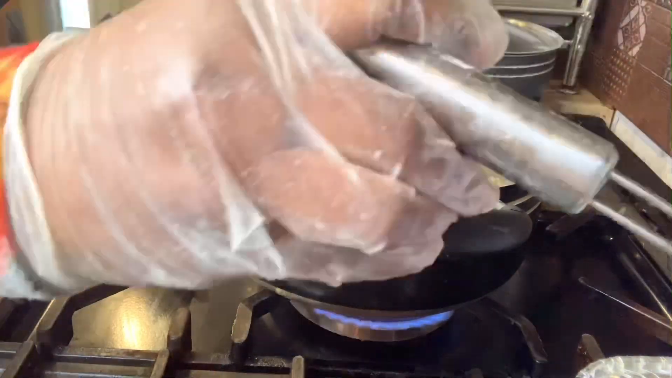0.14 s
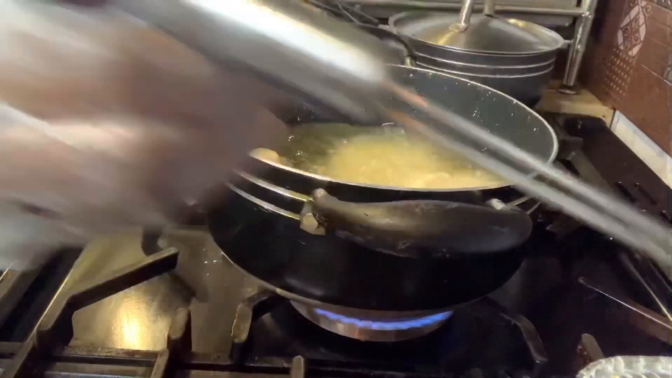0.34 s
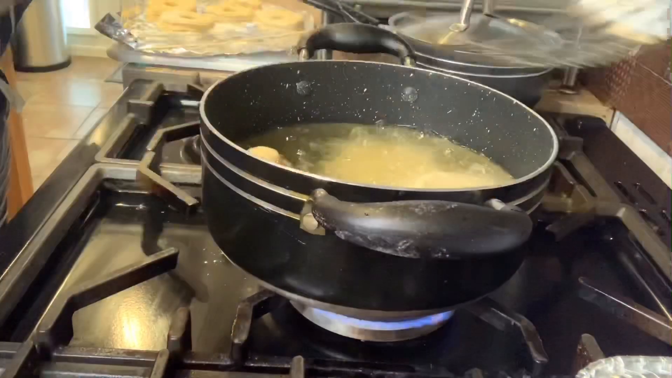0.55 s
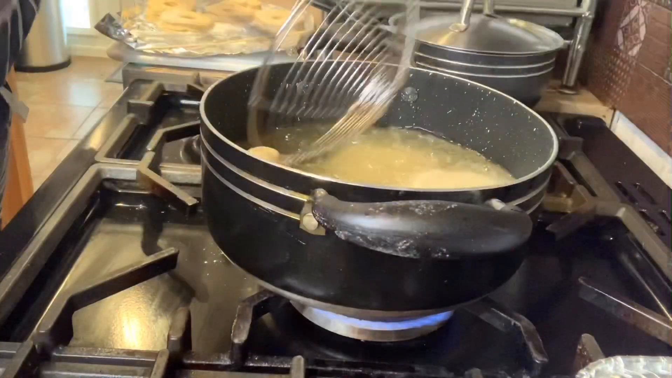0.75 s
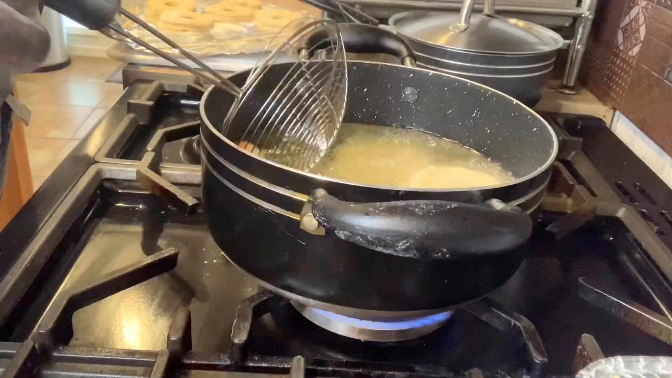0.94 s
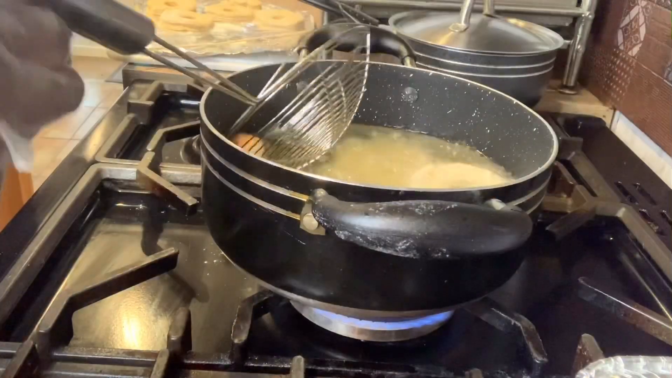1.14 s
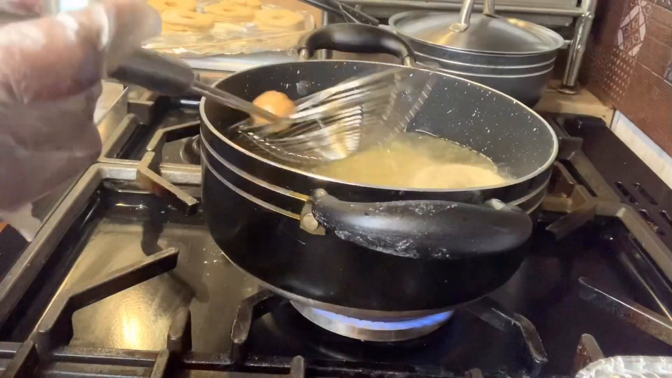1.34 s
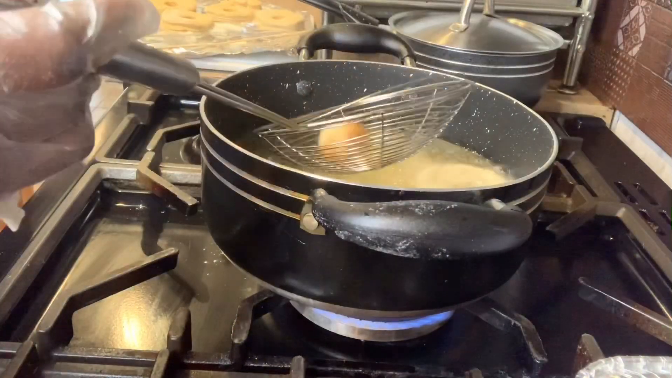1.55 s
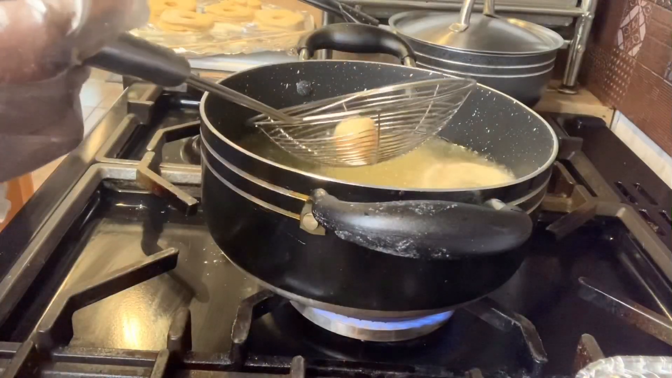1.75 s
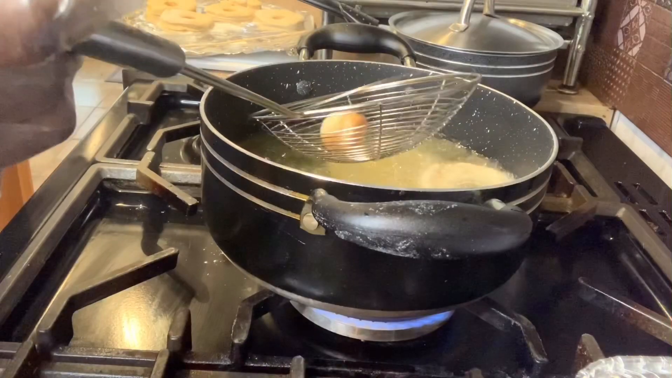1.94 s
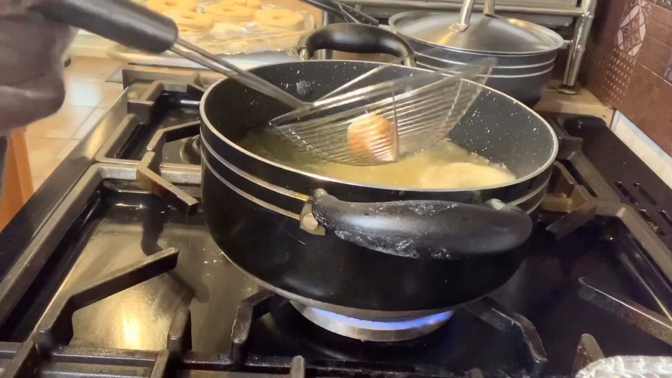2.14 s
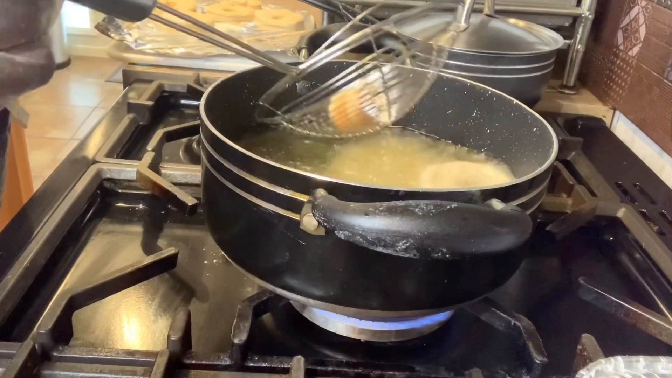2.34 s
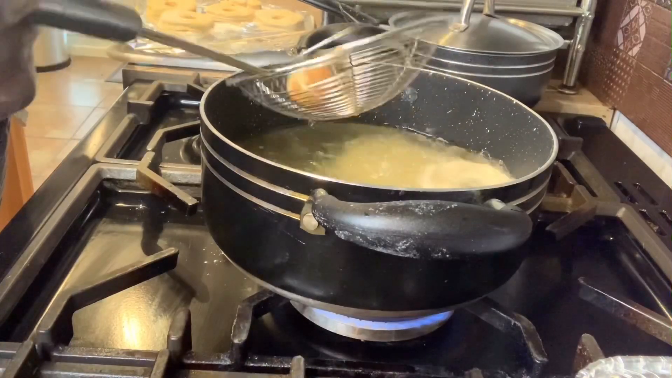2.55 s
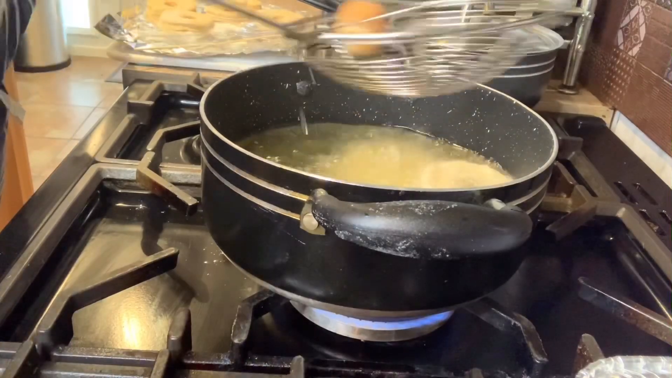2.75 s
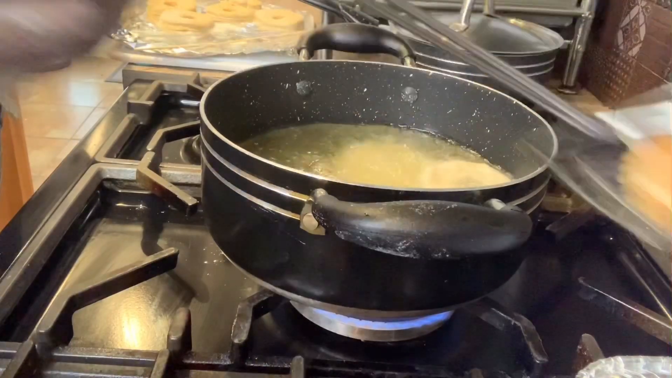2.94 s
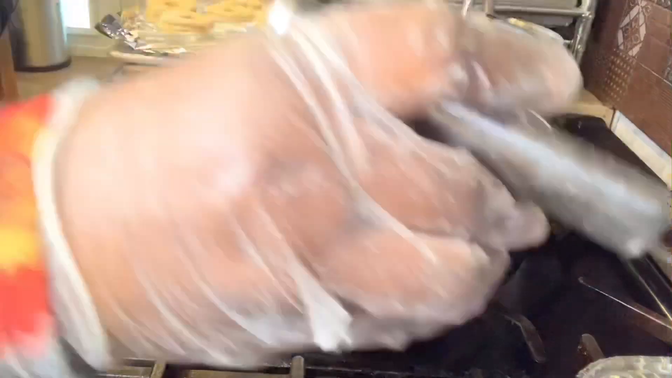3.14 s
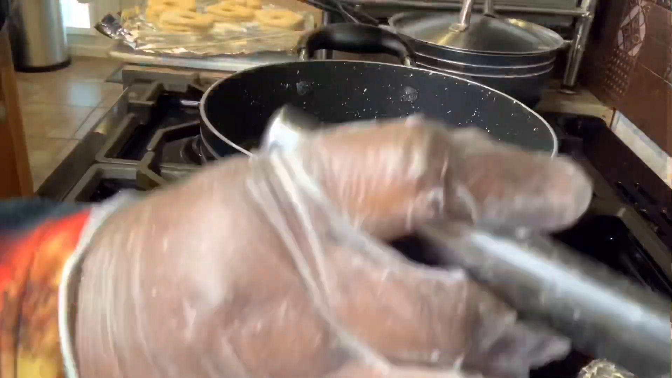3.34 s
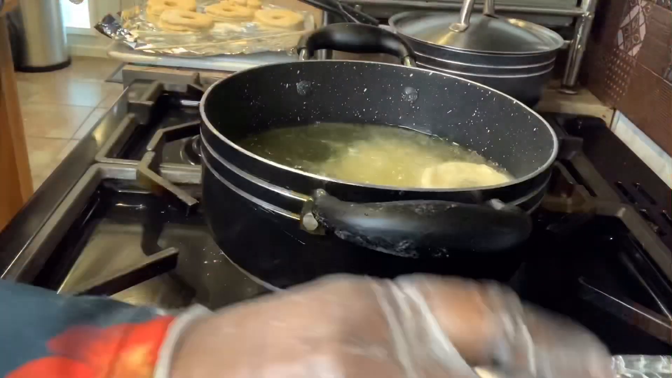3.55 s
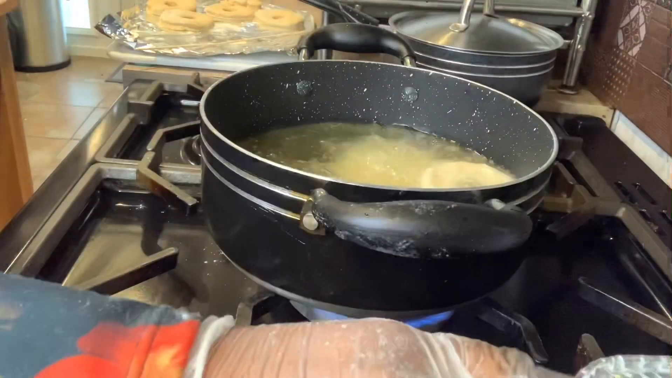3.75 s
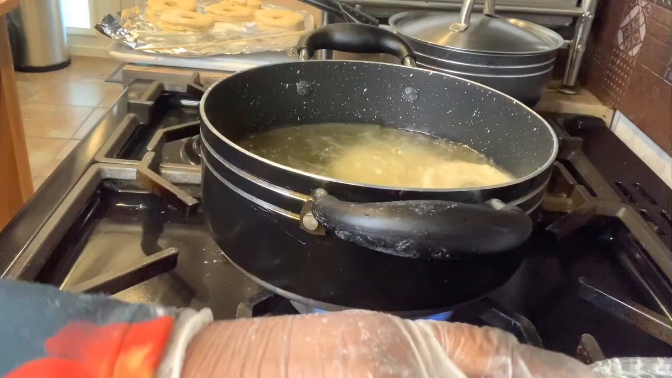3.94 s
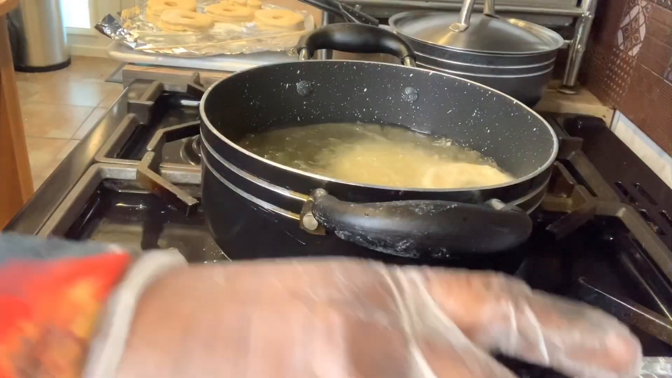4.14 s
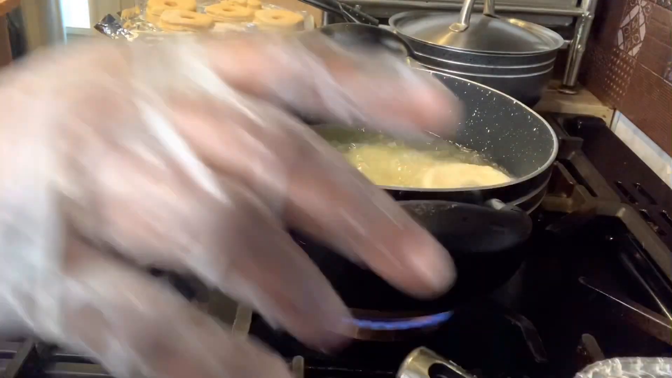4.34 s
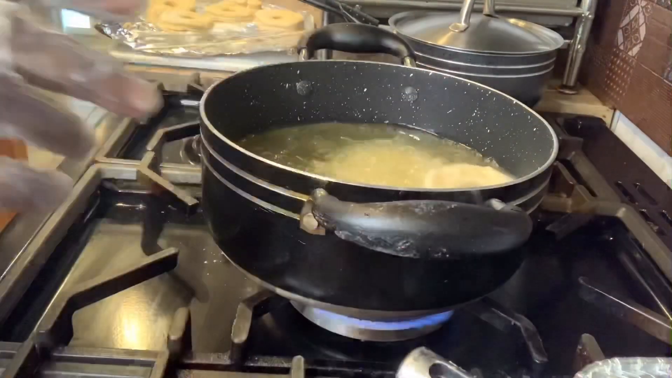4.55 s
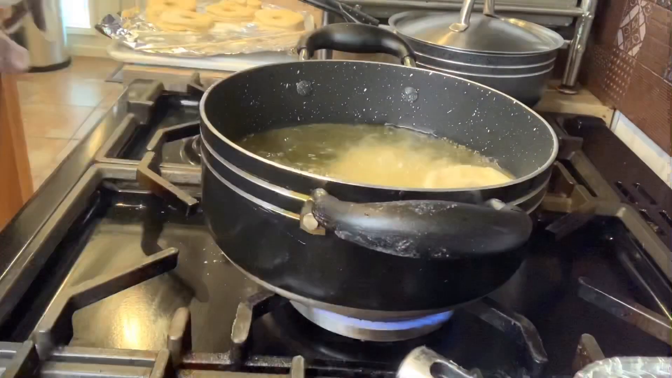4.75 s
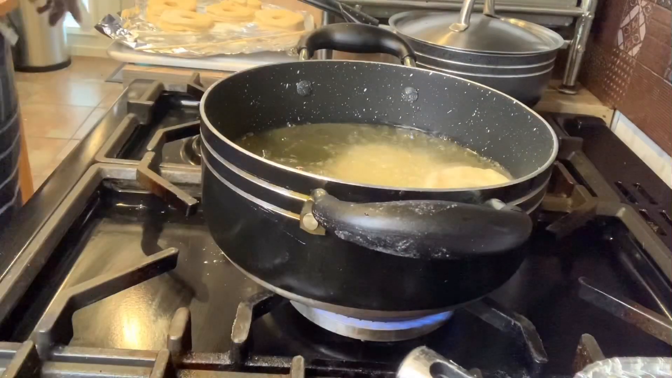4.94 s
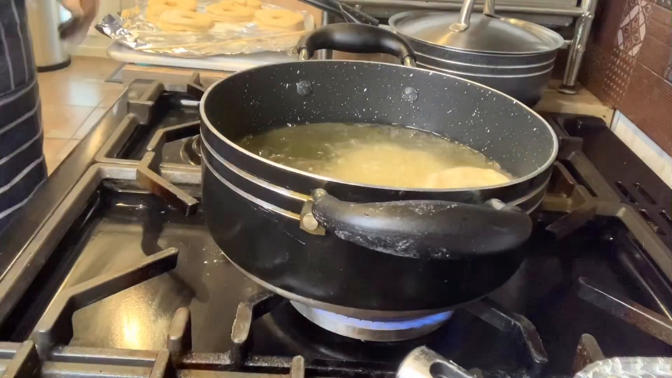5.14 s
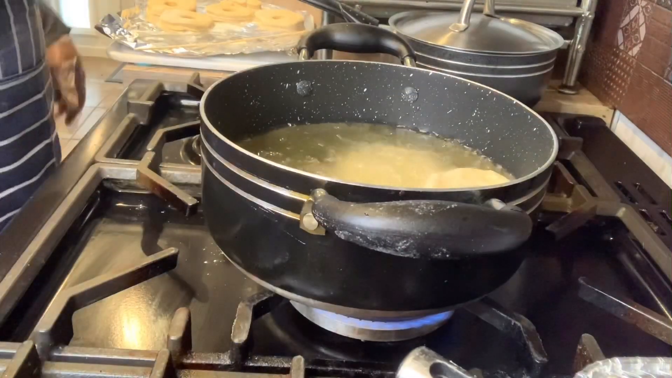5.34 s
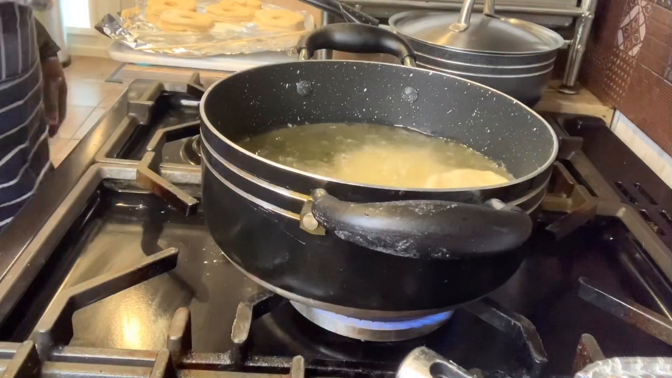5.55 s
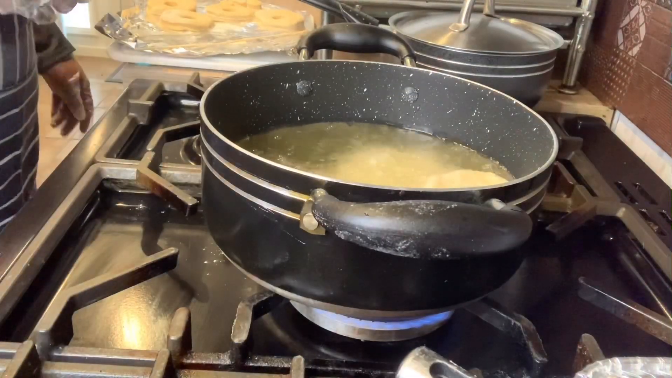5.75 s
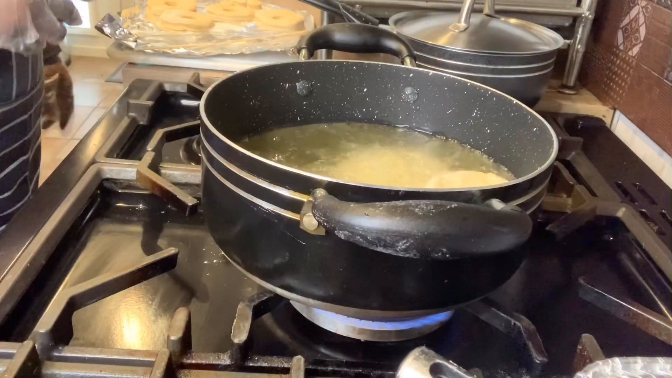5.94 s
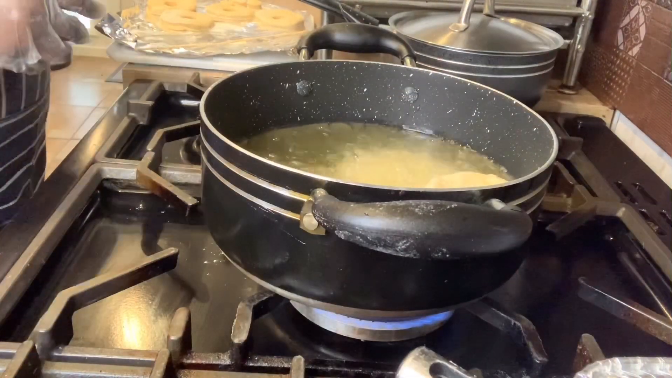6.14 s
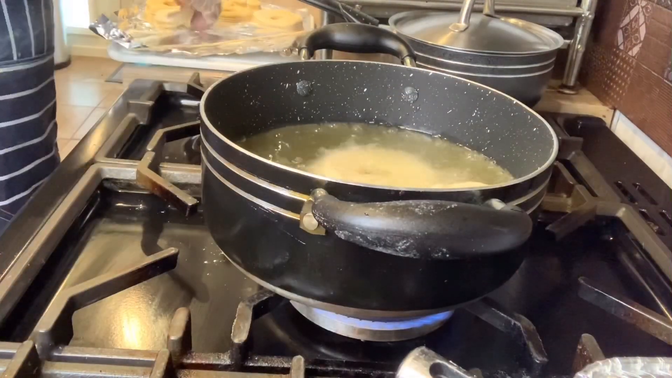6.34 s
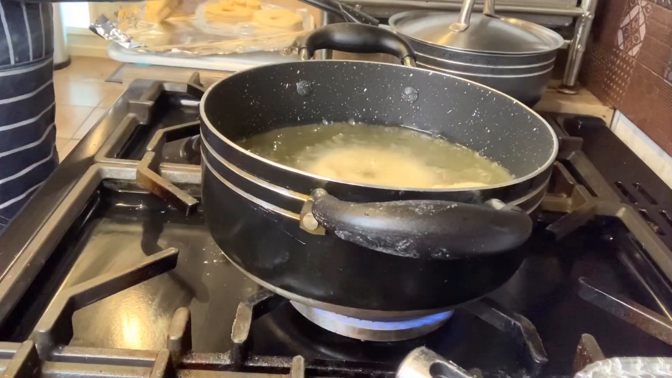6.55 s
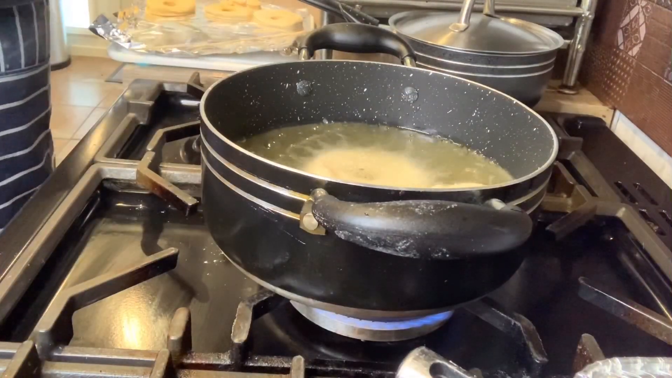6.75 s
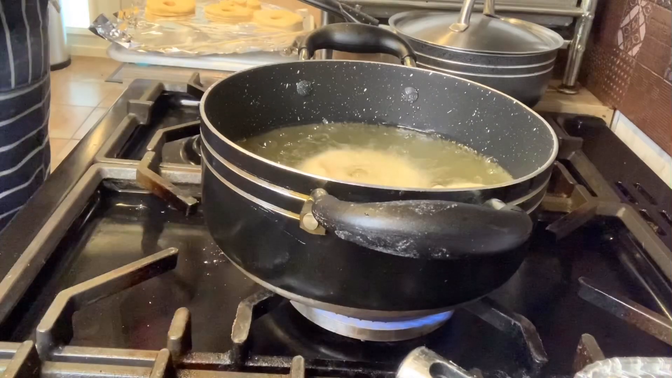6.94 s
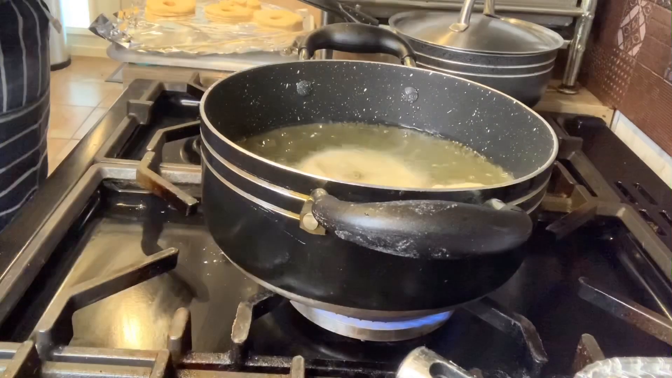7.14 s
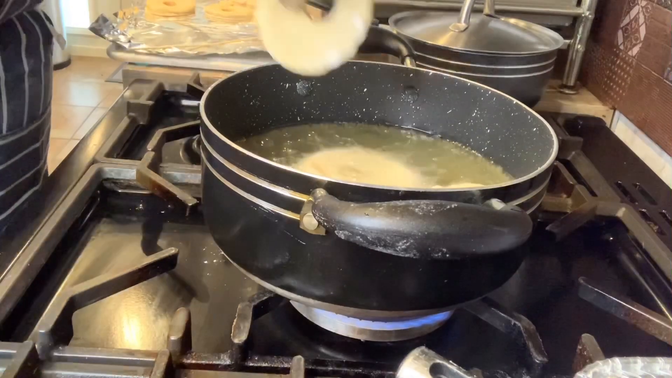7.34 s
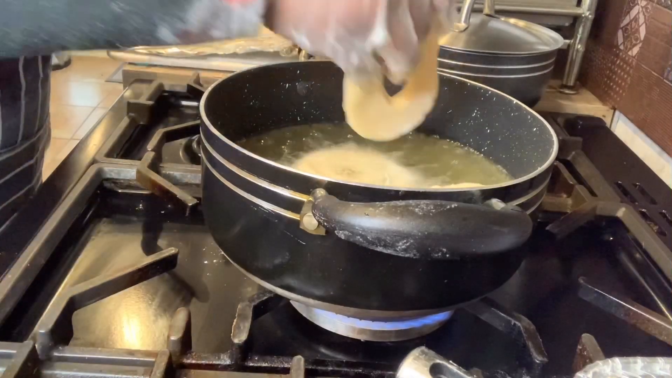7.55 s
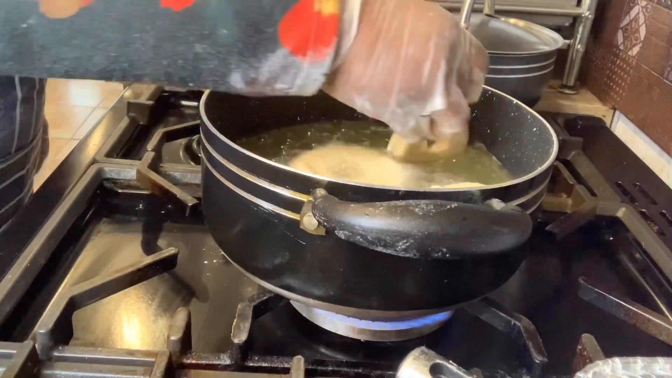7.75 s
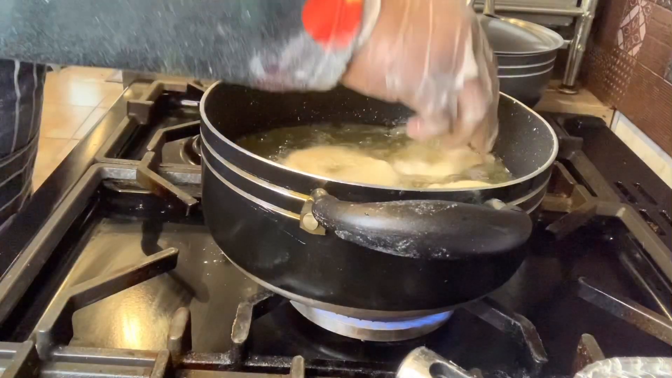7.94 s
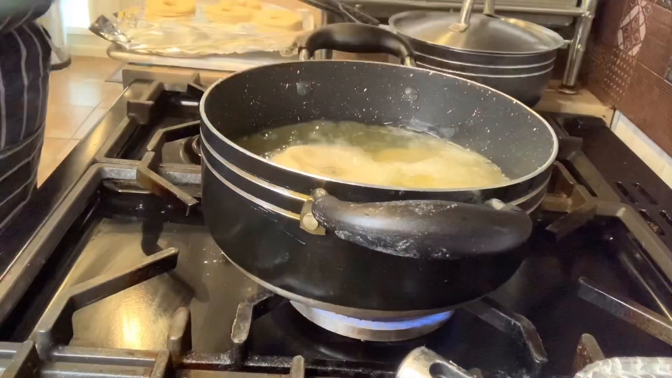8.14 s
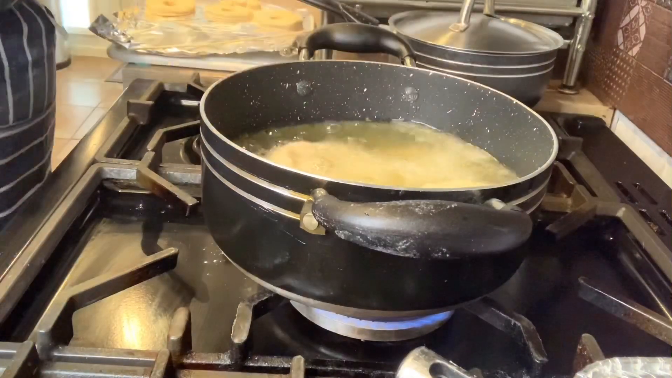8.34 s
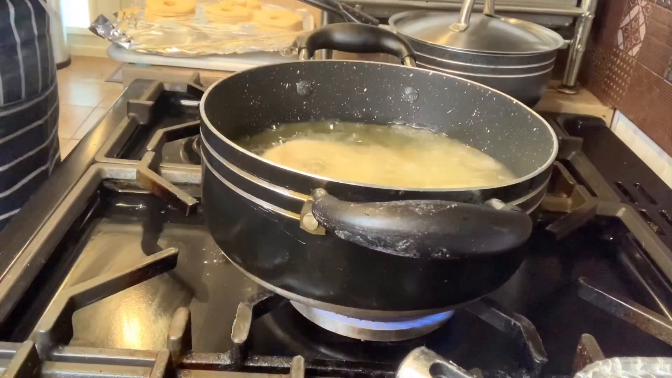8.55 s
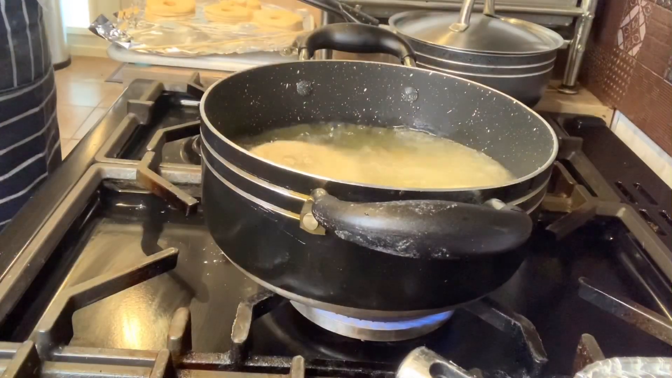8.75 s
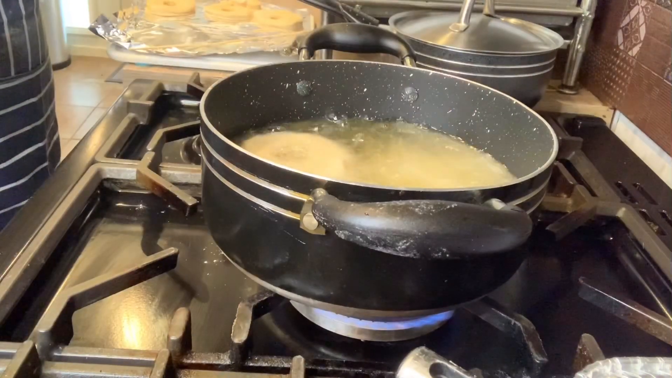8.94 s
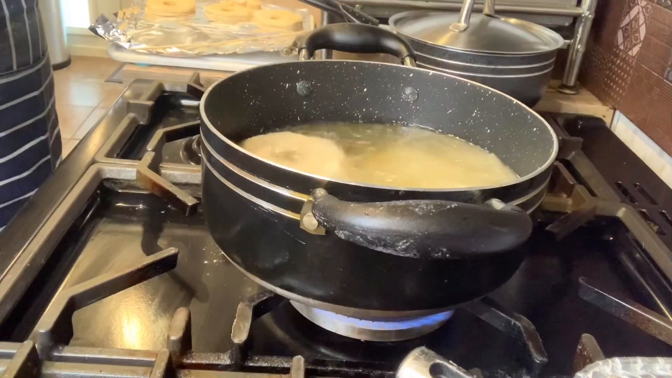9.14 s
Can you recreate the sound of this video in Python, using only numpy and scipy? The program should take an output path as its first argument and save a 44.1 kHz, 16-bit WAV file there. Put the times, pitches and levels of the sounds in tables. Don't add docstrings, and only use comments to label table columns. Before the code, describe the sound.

Close stereo phone pickup of home frying: steady airy burner hiss, fine bubbling and a soft low fan hum. Early metal knocks and light wire clinks at the pot give way to one sharp iron clang as the skimmer is laid down, with small rattles dying away. Sparse oil pops, a dry burst of crinkling foil, then only quiet frying in a short room echo.

```python
import sys
import numpy as np
from scipy import signal
from scipy.fft import rfft, irfft, next_fast_len
from scipy.io import wavfile
from scipy.ndimage import uniform_filter1d, map_coordinates

SR = 44100
rng = np.random.default_rng(int(sys.argv[2]) if len(sys.argv) > 2 else 0)


def amplitude_ratio(level_db):
    exponent = np.asarray(level_db, float) / 20
    return 10 ** exponent


def output_pcm(signal):
    pcm = np.clip(np.atleast_2d(signal).T, -1, 1) * 32767
    wavfile.write(sys.argv[1], SR, np.round(pcm).astype(np.int16))


N = 405367


def unit(x):
    return x / np.sqrt(np.mean(x ** 2) + 1e-20)


def along(points, hz):
    f, v = np.transpose(points)
    return np.interp(np.log(hz + 1), np.log(f + 1), v)


def wobble(rate):
    knots = rng.standard_normal(int(N * rate / SR) + 4)
    return map_coordinates(knots, [np.arange(N) * rate / SR])


def filtered(x, response):
    m = next_fast_len(x.shape[-1] + 8192)
    spectrum = rfft(x, m) * response(np.fft.rfftfreq(m, 1 / SR))
    return irfft(spectrum, m)[..., :x.shape[-1]]


def coloured(x, spectrum):
    return filtered(x, lambda hz: unit(amplitude_ratio(along(spectrum, hz))))


def resonant(x, peaks):
    def response(f):
        total = 0
        for k, (centre, width, db) in enumerate(peaks):
            damping = 1j * f * width
            total = total + (-1) ** k * amplitude_ratio(db) * damping / (centre * centre - f * f + damping)
        return total / np.sqrt(np.mean(abs(total) ** 2))
    return filtered(x, response)


def noise(patchy_db):
    z = signal.stft(rng.standard_normal((2, N)), nperseg=512)[2]
    field = uniform_filter1d(rng.standard_normal(z.shape[1:]), size=4, axis=0)
    field = uniform_filter1d(field, size=8, axis=1)
    return unit(signal.istft(z * amplitude_ratio(patchy_db * unit(field)), nperseg=512)[1][:, :N])


def tone(hz, db):
    phase = 2 * np.pi * np.cumsum(hz * np.ones(len(db))) / SR
    return amplitude_ratio(db + 3.5) * np.array([np.sin(phase), 0.32 * np.cos(phase)])


def add(track, s, sound):
    part = track[:, round(s * SR):][:, :sound.shape[1]]
    part += sound[:, :part.shape[1]]


def burst(t60, attack):
    t = np.arange(SR // 5) / SR
    envelope = amplitude_ratio(-60 * t / max(t60, .004)) * (1 - np.exp(-t / attack))
    return rng.standard_normal((2, len(t))) * envelope


def hood():
    # pitch_hz, level_db
    orders = [(56.5, -56), (113, -61.5), (226, -68.5)]
    # pitch_hz, level_db
    rumble = [(15, -34), (25, -11), (43, -4.5), (67, -7.5), (126, -4), (184, -12.5), (295, -13), (316, -12),
              (358, -32), (401, -20), (545, -30), (609, -20.5), (700, -20), (910, -63), (1540, -120)]
    lines = 0
    for k, (hz, db) in enumerate(orders):
        lines = lines + tone(hz + 0.318 * wobble(2.5), db + (0.63 + 0.5335 * k) * wobble(7))
    return lines + amplitude_ratio(-55 + 0.51 * wobble(5)) * coloured(noise(patchy_db=2.0), rumble)


def burner():
    # pitch_hz, level_db
    flame = [(300, -1), (600, -6), (1400, -1), (1690, 8), (2050, -1.5), (2900, -4.5), (4000, -3.5),
             (6000, -2.5), (6450, 3), (7000, 1), (10500, 3), (13000, -2), (15700, -0.5), (16000, -41.5)]
    # start_s, end_s, level_db
    spells = [(.2, .4, -63.5), (.65, 1.4, -63.5), (1.6, 3.05, -65), (3.25, 3.55, -67), (3.8, 4.5, -73.5),
              (4.6, 5.75, -64.5), (6.1, 7.43, -65.5), (7.75, 8.852, -62.5), (9.03, 9.3, -63)]
    off_db, fade_s = -90.5, 0.04606
    t = np.arange(N) / SR
    hz = 11250 + 4.1 * t
    db = off_db
    for start, end, level in spells:
        db = db + (level - off_db) * np.clip(np.minimum(t - start, end - t) / fade_s, 0, 1)
    whistle = tone(hz + 9 * wobble(2.5) + 15 * wobble(70), db + 2.16 * wobble(25))
    return whistle + amplitude_ratio(-50.5 + wobble(8.4) / 3) * coloured(noise(patchy_db=1.9), flame)


def glove():
    # start_s, length_s, level_db, pitch_hz, width_hz
    scuffs = [(3.32, 0.35, -50, 9900, 5700), (3.6, .04, -45.5, 10700, 4800), (5.4, .2, -54, 2040, 2050)]
    out = np.zeros((2, N))
    for s, length, db, centre, width in scuffs:
        stroke = np.hanning(int(length * SR))
        rub = stroke * rng.standard_normal((2, len(stroke)))
        add(out, s, amplitude_ratio(db) * resonant(rub, [(centre, width, 0)]))
    return out


def foil():
    # start_s, peak_db
    creases = [(6.1856, -27.5), (6.196, -24), (6.2244, -28.5), (6.2396, -28), (6.2692, -34.5),
               (6.3323, -26), (6.3449, -32), (6.3853, -29.5), (6.4109, -29), (6.4711, -24), (6.4941, -21.5),
               (6.5072, -24.5), (6.5183, -26), (6.5444, -47)]
    # pitch_hz, level_db
    sheet = [(1000, -26), (3000, -13), (4700, -7), (7000, -3), (11000, 0), (15700, -2), (16200, -30)]
    # pitch_hz, level_db
    slack = [(500, -17), (1200, -10), (2300, -12), (3200, -6), (4700, 0), (6500, -4), (9000, -30)]
    t60 = 0.1995
    bright, dull = np.zeros((2, 2, N))
    for s, db in creases:
        add(bright, s - .001, amplitude_ratio(db - 8) * burst(t60, attack=0.00107))
        add(dull, s - .001, amplitude_ratio(db - 26.5) * burst(1.733 * t60, attack=0.00517))
    clumps = amplitude_ratio(2.26 * wobble(350) + 1.26 * wobble(90))
    return coloured(bright * clumps, sheet) + coloured(dull * clumps, slack)


def bubbles():
    # time_s, level_db
    bubbling = [(0, -0.5), (1.9, 9), (2.5, -6.5), (3.0, 8), (4.1, 6.5), (5.5, 4), (6.9, -8.5), (7.9, -1.5),
                (9.19, -9)]
    draw = rng.random((1500, 5))
    hz = 2200 * amplitude_ratio(16.05 * (draw[:, 1:2] - draw[:, 2:3]))
    t = np.arange(SR // 120) / SR
    cycles = hz * t
    grain = np.sin(2 * np.pi * cycles * (1 + 0.0114 * cycles)) * cycles * np.exp(-cycles / 2.034)
    size = amplitude_ratio(-62.5 - 2.38 * np.log(draw[:, 3:4]))
    at = (draw[:, :1] * N).astype(int) + np.arange(len(t))
    angle = draw[:, 4:] * np.pi
    paths = []
    for share in (np.cos(angle), np.sin(angle)):
        paths.append(np.bincount(at.ravel(), (grain * size * share).ravel(), minlength=N)[:N])
    return np.array(paths) * amplitude_ratio(np.interp(np.arange(N) / SR, *np.transpose(bubbling)))


def popping(events):
    out = np.zeros((2, N))
    for s, db, centre, t60, width in events:
        add(out, s, amplitude_ratio(db + 3) * resonant(burst(t60, attack=1 / 4000), [(centre, width, 0)]))
    return out


def oil():
    # start_s, peak_db, pitch_hz
    spits = [(2.5412, -31.5, 11070), (4.1472, -34.5, 9850), (5.0702, -34, 11240), (5.1464, -29.5, 12370),
             (5.2165, -45.5, 11300), (5.527, -36, 11820), (5.6343, -41.5, 11300), (5.8325, -37.5, 12300),
             (7.6046, -42, 11700), (7.9659, -38, 11300), (7.9927, -31.5, 10930)]
    # start_s, peak_db, pitch_hz
    lower_spits = [(0.1058, -41, 4490), (0.596, -48.5, 2010), (1.0238, -51, 1440), (1.156, -46.5, 1500),
                   (1.8721, -47.5, 1360), (2.5401, -35.5, 6700), (3.3273, -44.5, 3729),
                   (4.8807, -44.5, 5440), (5.1426, -50.5, 1635), (5.3968, -41.5, 6450),
                   (5.5745, -54.5, 5750), (6.9403, -35, 6760), (8.2802, -54, 1630), (8.9196, -63.5, 1630),
                   (9.1548, -50.5, 3029)]
    events = [(*row, 0.0147, 3670) for row in spits]
    events += [(*row, 0.0303, 610) for row in lower_spits]
    return bubbles() + popping(events)


def ticking():
    # start_s, peak_db, pitch_hz, t60_s, width_hz
    ticks = [(.354, -43, 5640, .04, 2000), (3.166, -43, 5550, 0.124, 3000),
             (3.213, -42.5, 3570, 0.054, 600), (3.599, -21.5, 6380, 0.0275, 800),
             (3.597, -15.5, 9450, 0.0168, 6000), (4.768, -53.5, 4800, 0.0292, 1500)]
    return popping(ticks)


def clinking():
    # start_s, peak_db, pot_db, wires_db, attack_s
    clinks = [
        (0.8697, -21.5, 0, -32, 0.00074),
        (1.1344, -27, -9.5, 1, 0.004),
    ]
    # pitch_hz, level_db, t60_s
    pot_modes = [(1140.7, -6, 0.164), (1391, 2, 0.0415), (1500, 6, 0.035), (1598, 0, 0.0334),
                 (2085.4, 1, 0.06), (4924.1, -7.5, 0.022), (6341.4, -3.5, 0.0184), (7290, -3.5, 0.0308),
                 (9460, -0.5, 0.018), (10965, -4, 0.016), (13110, -10.5, .02)]
    # pitch_hz, level_db, t60_s
    wire_modes = [(1520, -16.5, 0.32), (3008, -7.5, 0.14), (3105, -3.5, 0.066), (2907, -11, 0.03077),
                  (3322, -1.5, 0.03), (3646.7, -3, 0.047), (3730, 3.5, 0.04053), (3890, 2, 0.05),
                  (4190, -9, 0.0314), (6360, -7, 0.0523), (7060, -14.5, 0.044)]

    def widths(modes):
        return [(hz, np.log(1000) / np.pi / t60, db + 10 * np.log10(t60)) for hz, db, t60 in modes]

    out = np.zeros((2, N))
    for s, db, pot_db, wires_db, attack in clinks:
        pot = amplitude_ratio(pot_db) * resonant(burst(0.0286, attack), widths(pot_modes))
        wires = amplitude_ratio(wires_db) * resonant(burst(0.0365, attack), widths(wire_modes))
        add(out, s - .001, amplitude_ratio(db + 6) * (pot + wires + amplitude_ratio(-16) * burst(0.059, attack)))
    return out


def handle():
    # peak_time_s, peak_db, pitch_hz, rise_s (60 dB build-up; negative: sets in at
    # once, already fading), t60_s
    hums = [(.192, -35.5, 154.6, 0.0552, 0.225), (.28, -40.5, 158, 0.05, 0.335),
            (.744, -40.5, 152.8, 0.2, 0.13), (.905, -44, 149.8, 0.0053, .15),
            (.96, -48.5, 153.7, 0.24, 0.283), (.925, -49, 85.3, 0.1, 0.446),
            (3.218, -30, 130.4, 0.03, 0.186), (3.678, -34, 58.35, 0.3, 0.187),
            (3.76, -47.5, 62.1, -0.8, 1.2)]
    out = np.zeros((2, N))
    t = np.arange(-SR // 8, SR // 2) / SR
    for s, db, hz, rise, t60 in hums:
        add(out, s + t[0], tone(hz, db - 60 * np.maximum(-t / rise, t / t60)))
    return out


def stove():
    # pitch_hz, width_hz, level_db
    iron = [(489, 65.6, -8.5), (646, 75.1, -8.5), (795.2, 38.8, 3), (915.8, 71, 2), (1038.6, 55, -2),
            (1136, 60, -5.5), (1291, 59, -4), (1433, 32.7, -0.5), (1619, 75.34, -4.5), (1893, 85, -9.5),
            (2203, 145, -10.5)]
    # pitch_hz, width_hz, level_db
    body_modes = [(56.7, 9.6, -9), (132.2, 40.1, -1.5), (270.7, 40.8, -7), (325, 47.46, -6), (385, 40, -12)]
    # pitch_hz, level_db
    crack_spectrum = [(1500, -26), (2500, 3.5), (4000, 1.5), (5600, -9), (6800, -1), (8000, -17.5),
                      (9500, 1.5), (12500, -18.5), (15500, -10), (17000, -39.5)]
    # start_s, peak_db, hardness_db
    lift = [(0.106, -51, 5.5), (0.156, -44, -1), (0.168, -32, -7.5), (0.186, -36, -7.5), (0.194, -30, -9.5),
            (0.204, -30, -7)]
    drag = [(0.318, -23.5, -5), (0.3245, -28.5, -16.5), (0.336, -30.5, -26.5), (0.351, -58, -2.5),
            (0.889, -42.5, -13.5)]
    touch = [(3.166, -49.5, 6), (3.209, -27.5, -13), (3.239, -33.5, -28), (3.27, -47.5, -21)]
    drop = [(3.561, -26.5, -7.5), (3.5705, -6.5, -14.5), (3.584, -17, -3.5), (3.597, -14.5, -0.5),
            (3.607, -14.5, -24), (3.619, -20, -5.5), (3.65, -21, -12), (3.674, -27, -24)]
    settle = [(3.758, -32.5, -3.5), (3.792, -29.5, -5.5), (3.845, -30, -5), (3.857, -27.5, -6.5),
              (3.874, -40, -12), (3.909, -46, 1.5), (4.084, -54, 13.5), (4.156, -38.5, 1),
              (4.245, -41.5, 1.5), (4.516, -42, 2), (4.624, -45, 2), (9.053, -48.5, -19.5)]
    # contacts, thud_db, t60_s, left_minus_right_db
    moves = [(lift, -1.7, 0.0794, -5), (drag, -11, 0.0588, -3), (touch, -2, 0.1044, -6.5),
             (drop, -4.5, 0.0688, -4.5), (settle, -3, 0.084, -4)]
    out = np.zeros((2, 2, N))
    for contacts, thud_db, t60, pan_db in moves:
        for s, db, crack_db in contacts:
            blow = 9 * amplitude_ratio(min(crack_db, 0) / 2) * (np.arange(SR // 5) == 20)
            rattle = burst(t60, attack=0.00245) + 1.53 * burst(0.0075, attack=0.00046)
            ring = 0.5087 * np.sqrt(t60) * unit(resonant(blow + rattle, iron))
            thump = resonant(burst(1.26 * t60, attack=0.003392), body_modes)
            thud = amplitude_ratio(thud_db) * np.array([[1], [1.9]]) * thump
            snap = 0.872 * burst(1.006 * t60, attack=0.00201) + burst(0.0169, attack=0.00028)
            crack = amplitude_ratio(crack_db) * coloured(snap, crack_spectrum)
            for side, sign in zip(out, (1, -1)):
                add(side, s - .002, amplitude_ratio(db - 1.5) * (amplitude_ratio(sign * pan_db / 2) * (ring + thud) + crack))
    return out


def kitchen(x):
    # pitch_hz, t60_s
    room_decay = [(150, 0.5249), (1000, 0.366), (5000, 0.342), (14000, 0.143)]
    hz, t, z = signal.stft(rng.standard_normal((2, SR // 2)), SR, nperseg=256)
    z = z * amplitude_ratio(-60 * t / along(room_decay, hz)[:, None])
    tail = signal.istft(z, SR, nperseg=256)[1]
    delayed = np.pad(x, ((0, 0), (300, 0)))
    return signal.fftconvolve(delayed, tail / np.linalg.norm(tail[0]), axes=1)[:, :N]


def ports(shared, own):
    # pitch_hz, correlation
    alike = [(60, .96), (200, .75), (500, .3), (1500, .45), (3000, .3), (5800, .2), (7000, .55),
             (7700, .96), (9300, .96), (10000, .65), (11000, .65), (11700, .98), (13600, .98), (14100, .55),
             (15000, .7), (15400, .98)]
    # pitch_hz, half_turns
    lead = [(0, 0), (700, 0), (1800, -.7), (4000, -.1), (5800, .3), (7600, 1), (9400, 1), (11600, 2),
            (13600, 2), (15200, 3)]
    # pitch_hz, left_minus_right_db
    tilt = [(100, -2.5), (300, -3), (700, 2.5), (1800, 4), (4500, 1.5), (7000, .5), (7600, 0)]
    sign = np.array([[1], [-1]])

    def turn(hz):
        return np.arccos(np.clip(along(alike, hz), -1, 1)) / 2

    def imbalance(hz):
        phase = np.exp(-.5j * np.pi * sign * np.interp(hz, *np.transpose(lead)))
        return amplitude_ratio(sign * along(tilt, hz) / 2) * phase

    common = filtered(shared, lambda hz: imbalance(hz) * np.cos(turn(hz)))
    return common + filtered(own, lambda hz: sign * imbalance(hz) * np.sin(turn(hz)))


def scene():
    skimmer = clinking() + handle()
    sharp = oil() + ticking() + stove()
    near = sharp + foil() * [[1], [.75]] + glove()
    room = amplitude_ratio(-10.0) * kitchen(near.mean(0) + amplitude_ratio(-4.5) * skimmer)
    paths = near + skimmer + room + hood() + burner()
    direct = amplitude_ratio(-21.5) * (sharp[0] + skimmer)
    return ports(paths[:, 0], paths[:, 1]) + direct


def top_cut(x):
    return signal.sosfilt(signal.butter(12, 16620, fs=SR, output="sos"), x)


def record(dry):
    # pitch_hz, level_db
    band = [(25, -22.5), (45, 0), (15800, 0), (16000, -18.5), (16500, -26), (16700, -69.5)]
    heard = filtered(dry, lambda hz: amplitude_ratio(along(band, hz)))
    return top_cut(heard)


dry = scene()
out = record(dry)
output_pcm(out)
```